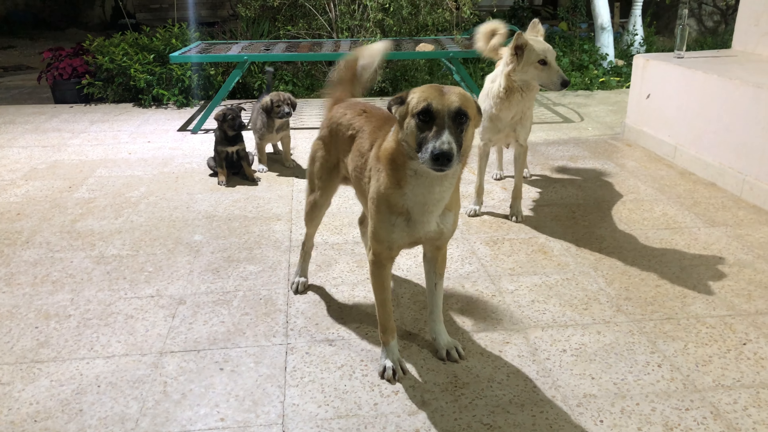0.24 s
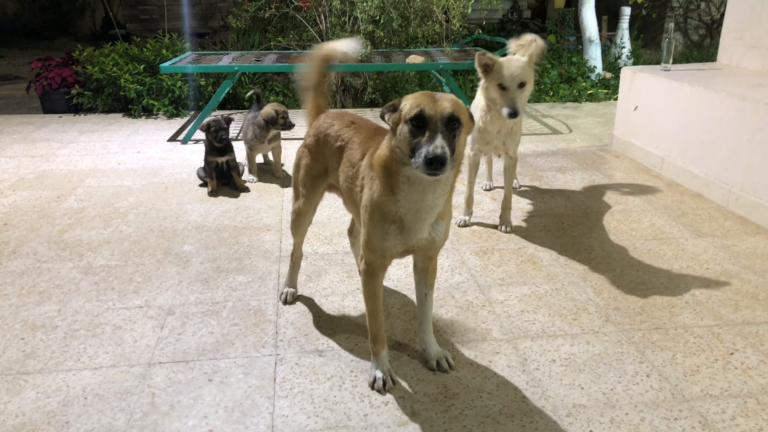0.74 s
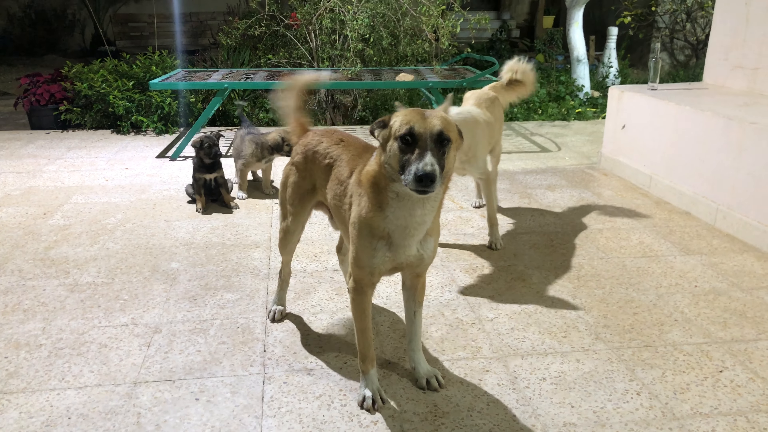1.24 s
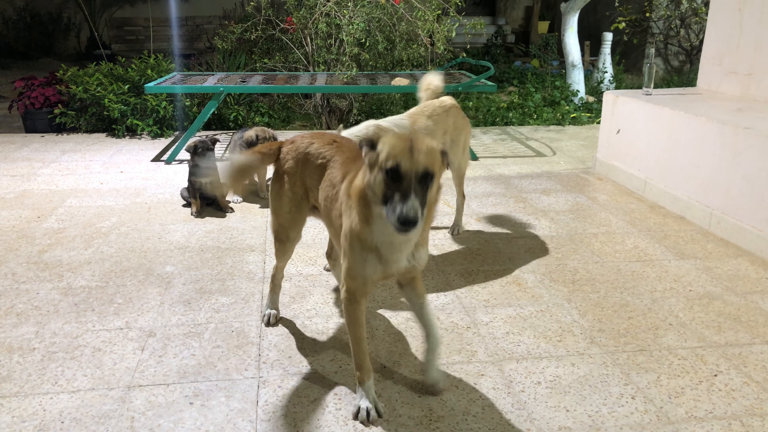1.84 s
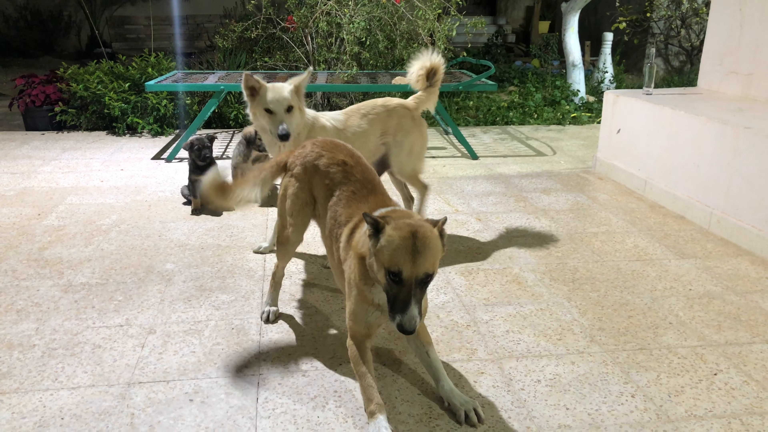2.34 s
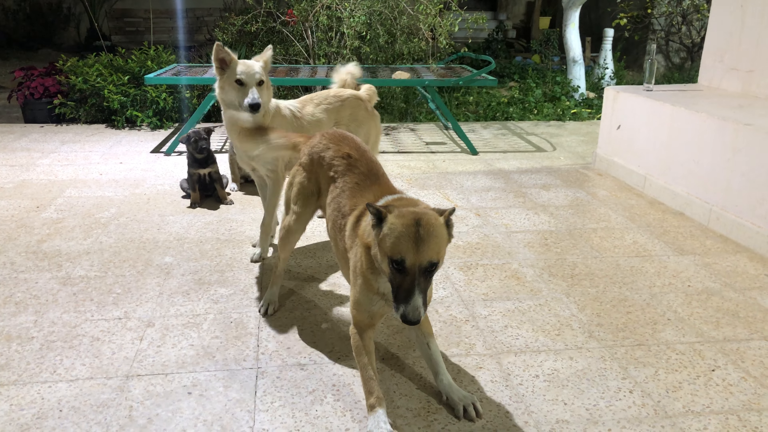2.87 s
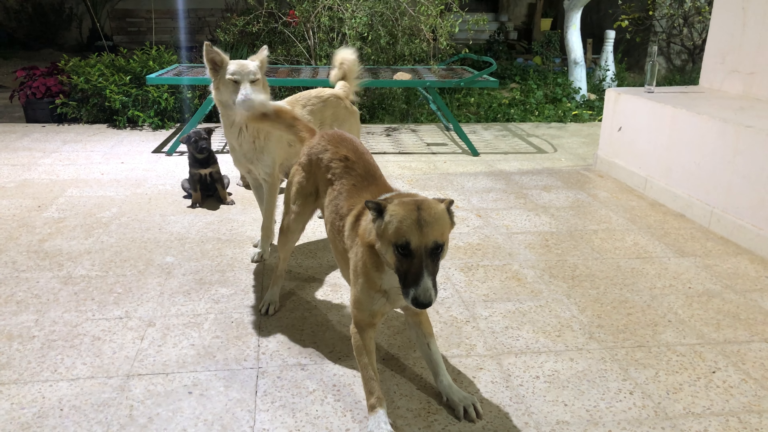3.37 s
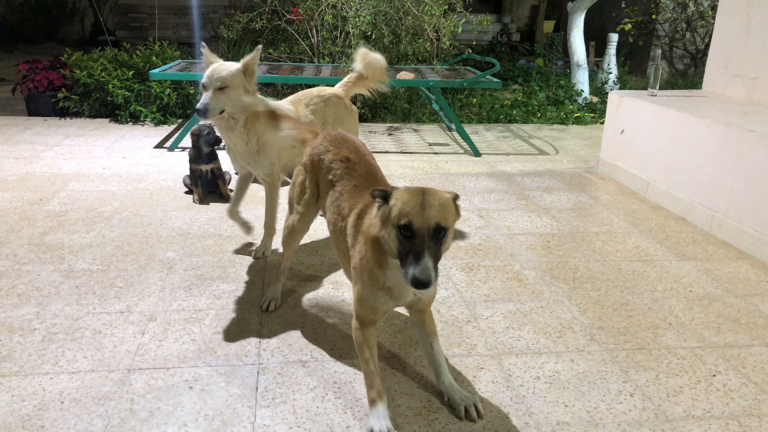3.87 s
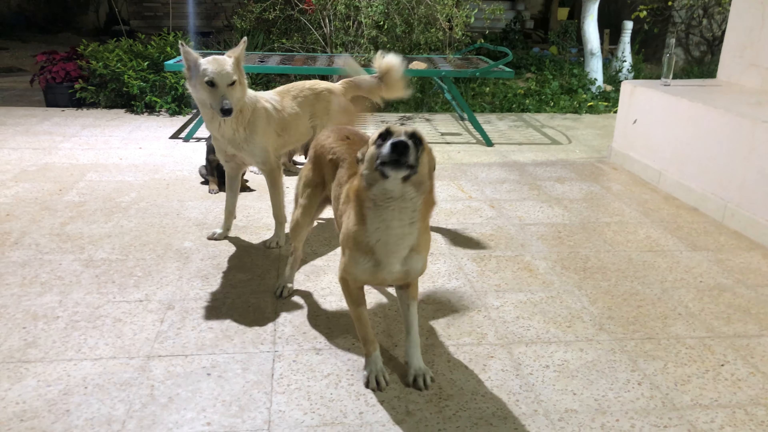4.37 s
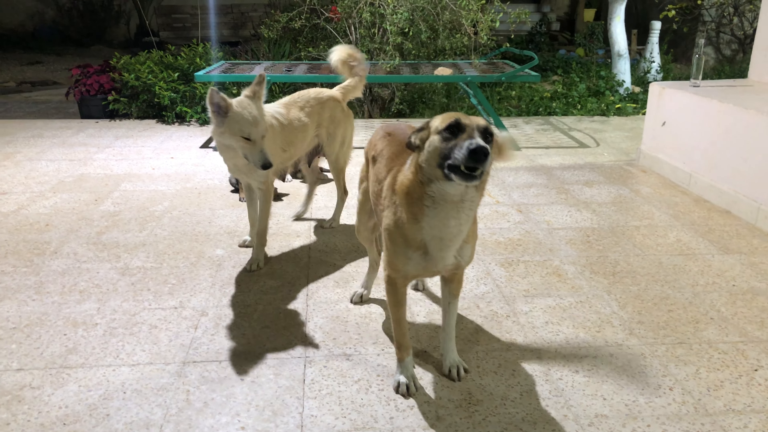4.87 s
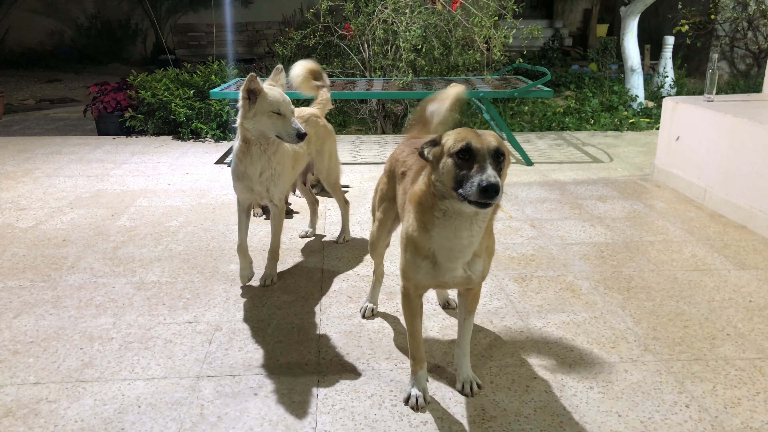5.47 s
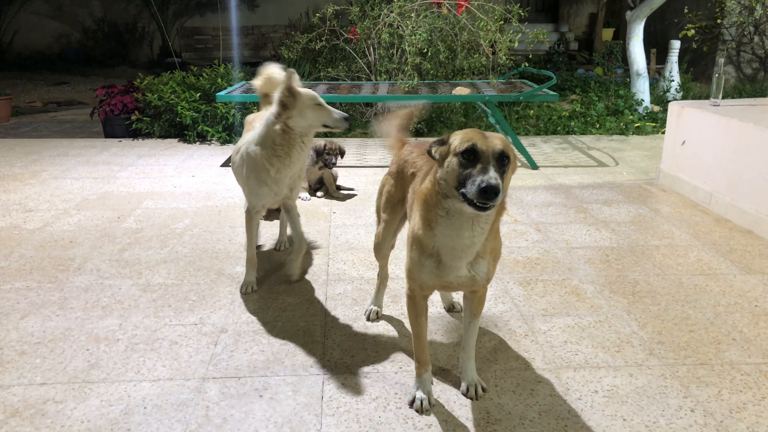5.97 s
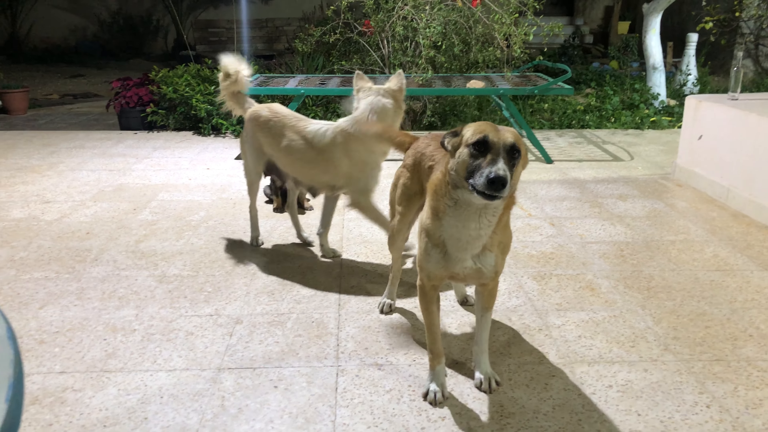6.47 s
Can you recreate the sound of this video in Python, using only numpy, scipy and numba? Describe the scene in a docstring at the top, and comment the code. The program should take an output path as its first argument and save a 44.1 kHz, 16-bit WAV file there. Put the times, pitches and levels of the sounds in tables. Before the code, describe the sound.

Very close to a phone microphone on a tiled patio at night, a big dog growls in six spells separated by brief gaps. The first is long, low and closed-mouthed; the second starts with a raised half-bark; the third is quiet and low. After a short grunt and paw scuffs come two harsher, higher snarls. Claws tick, a cricket chirps faintly, and a soft rumble lies beneath, with a short hard echo.

```python
"""A tiled patio at night: close to a phone, a dog growls in drawn-out spells.
Slow beats of its vocal folds ring chest, throat and mouth, and air hisses with each beat.
Loudness and rasp rise with the pitch; gusts of air tear at the voice, and once the dog sniffs.
Paws scuff as noise bumps, claws tick as short bursts, a cricket chirps in falling sine whistles.
Low walls echo all of these as a short noise tail; a faint night rumble lies beneath."""
import sys
import numpy as np
from scipy import signal
from scipy.fft import rfft, irfft, next_fast_len
from scipy.io import wavfile
from scipy.ndimage import uniform_filter1d
from numba import njit

SR = 44100
rng = np.random.default_rng(int(sys.argv[2]) if len(sys.argv) > 2 else 0)


def wav_record(signal):
    """Record a signal, one row per channel, as 16-bit PCM in the file named by sys.argv[1]."""
    frames = np.transpose(np.atleast_2d(signal))
    bounded = np.clip(frames, -1, 1)
    # unit amplitude maps onto the largest positive 16-bit level
    quanta = np.round(bounded * 32767).astype(np.int16)
    wavfile.write(sys.argv[1], SR, quanta)


N = 296263
T = np.arange(N) / SR  # time, s
TOP_HZ = 15900  # upper edge of the phone's range and of the echoes

# airway resonances in each posture, widths before damping: centre_hz [Hz], width_hz [Hz], level_db [dB]
LIPS_SHUT = [(601, 83, -6), (1495, 93, -28.5), (2340, 110, -41), (3250, 47, -29), (4600, 280, -15.5),
             (5020, 150, -9), (6500, 330, -20.5)]
HALF_BARK = [(610, 90, 14), (840, 70, 7), (1690, 110, 9), (2400, 60, -3), (4300, 280, -13),
             (5200, 180, -13), (6600, 200, -7)]
HEAD_DOWN = [(588, 100, -7), (2440, 64, -37), (4350, 35, -27), (4940, 550, -20)]
TEETH_BARED = [(518, 150, -2.5), (1050, 70, 0.5), (1490, 500, -4), (2683, 420, -3.5), (4020, 48, -2),
               (4440, 100, -9), (4800, 97, -27)]
# gusts of air through the open mouth, where the growl tears or lets go:
# centre_s [s], half_length_s [s], air_db [dB], push_db on the voice [dB]
GUSTS = [(1.321, 0.086, -55.5, 0.5), (1.829, 0.072, -50, 7.5), (2.413, 0.0067, -48, -6),
         (3.032, .14, -66, 4.5), (4.321, 0.012, -50, 9), (4.887, 0.074, -64, 5), (5.57, 0.063, -48.5, 3),
         (6.102, 0.045, -38, 4.5), (6.378, 0.073, -44.5, 0.5), (6.662, 0.029, -47, -4.5)]


def undb(db):
    """Decibels to gain."""
    return 10 ** (np.asarray(db) / 20)


def curves(table, t):
    """Each column of a table at the times t, joined by straight lines."""
    s, *columns = np.transpose(table)
    return [np.interp(t, s, column) for column in columns]


def unit(x):
    """Scale to rms 1."""
    return x / np.sqrt(np.mean(x ** 2) + 1e-20)


def steady(x, hold_s=0.043):
    """Scale to a running rms near 1; single beats keep their shape."""
    size = int(hold_s * SR)
    power = uniform_filter1d(uniform_filter1d(x ** 2, size), size // 2)
    return x / np.sqrt(np.abs(power) + 1e-4 * np.mean(x ** 2))


def band(x, lo_hz, hi_hz, order=3):
    """Band-pass between two edges."""
    edges_hz = [lo_hz, min(hi_hz, SR / 2 - 1000)]
    return signal.sosfilt(signal.butter(order, edges_hz, "band", fs=SR, output="sos"), x)


@njit
def ring(x, hz, width_hz):
    """One resonance whose centre may move, gain 1 at the centre."""
    y, b, low = np.empty(len(x)), 0., 0.
    for i in range(len(x)):
        g, k = np.tan(np.pi * hz[i] / SR), width_hz / hz[i]
        v = (b + g * (x[i] - low)) / (1 + g * (g + k))
        b, low, y[i] = 2 * v - b, low + 2 * g * v, k * v
    return y


def noise(spectrum):
    """Noise of rms 1 with a colour of (Hz, dB) points."""
    hz, db = np.transpose(spectrum)
    size = next_fast_len(N, True)
    bin_hz = np.fft.rfftfreq(size, 1 / SR)
    gain = undb(np.interp(np.log(bin_hz + 1), np.log(hz), db))
    return unit(irfft(rfft(rng.standard_normal(size)) * gain, size)[:N])


def walk(count, per_s):
    """A random wander of spread near 1: straight lines between random knots, per_s of them a second."""
    knots = rng.standard_normal(N // 20)
    return np.interp(T[:count] * per_s, np.arange(len(knots)), knots)


def swell(s, rise_s, fall_s):
    """A smooth bump of height 1 at time s."""
    out, near = np.zeros(N), np.abs(T - s) < .5
    t = T[near] - s
    side_s = np.where(t < 0, rise_s, fall_s)
    out[near] = np.exp(-np.minimum((t / side_s) ** 2, 20))
    return out


def envelope(t, attack_s, release_s):
    """A smooth rise at the start of the times t, a hold, and a smooth fall at their end."""
    ramp = np.clip(np.minimum((t - t[0]) / attack_s, (t[-1] - t) / release_s), 0, 1)
    return np.sin(np.pi / 2 * ramp) ** 2


def cricket(db=-64, start_hz=4560, glide_hz=620, stroke_s=0.0313, gap_s=.061, fade_db=2,
            echo_s=0.018, echo_db=-9):
    """A chirp is a few fading wing strokes, each a short falling whistle, repeated faintly by the garden wall."""
    # chirps: start_s [s], wing strokes [count]
    chirps = [(0.0, 2), (.481, 2), (.96, 3), (1.499, 2), (2.64, 1), (3.01, 2), (3.44, 3), (4.501, 2)]
    t = T[:int(stroke_s * SR)]
    whistle_hz = start_hz - glide_hz * t / stroke_s
    stroke = signal.windows.tukey(len(t), .5) * np.sin(2 * np.pi * np.cumsum(whistle_hz) / SR)
    out = np.zeros(N)
    for s, strokes in chirps:
        for k in range(round(strokes)):
            start = max(int((s + k * gap_s) * SR), 0)
            stroke_db = db - k * fade_db + 4.4 * walk(len(t), 380)  # each stroke shimmers
            out[start:start + len(t)] += undb(stroke_db) * stroke
    return out + undb(echo_db) * np.interp(T - echo_s, T, out, left=0)


def night(level_db=-55.5, waver_db=1.5):
    """Distant rumble and faint hiss, shaped from noise, whose level wavers."""
    # colour of the night air: freq_hz [Hz], density_db [dB per Hz]
    night_colour = [(20, -45), (35, -16), (75, -1.5), (180, 4), (260, -0.5), (360, -7.5), (800, -6.5),
                    (1500, -13), (2000, -20.5), (3200, -29.5), (4500, -27), (9000, -32.5), (16000, -37.5)]
    return noise(night_colour) * undb(level_db + waver_db * walk(N, 16.0))


def folds(pitch_hz, rough, jitter=0.061, shimmer_db=5.0, puff_db=2.6, rise_s=0.0022, fall_s=0.0031,
          air_leak=.17):
    """Beats of the vocal folds: their phase, a pulse at each closure, and the puff of turbulence that swells around it."""
    cycles = np.cumsum(pitch_hz) / SR
    chance = rng.standard_normal((400, 3))  # per beat: timing, strength, puff strength
    cycles = cycles + 1 + jitter * rough * np.interp(cycles, np.arange(len(chance)), chance[:, 0])
    beat = np.round(cycles).astype(int)
    since_s = (cycles - beat) / pitch_hz  # negative ahead of the closure
    size = undb(shimmer_db * rough * chance[beat, 1])
    pulses = np.diff(np.floor(cycles), prepend=np.floor(cycles[0])) * size
    puff = np.where(since_s < 0, np.exp(-(since_s / rise_s) ** 2), np.exp(-since_s / fall_s))
    leak = air_leak * (0.36 + rough)  # air that passes between the puffs too
    gate = size * undb(puff_db * chance[beat, 2]) * puff + leak
    return cycles % 1, unit(pulses), unit(gate * rng.standard_normal(N)[:len(cycles)])


def chest(phase, pitch_hz, fundamental_db, overtones_db, count=5):
    """The lowest harmonics are clean; each swells as it slides through a resonance of the chest."""
    # what chest and neck radiate at the easy pitch, before each spell's trim: freq_hz [Hz], level_db [dB]
    chest_response = [(55, -62), (70, -56.5), (84, -51.3), (105, -42.7), (125, -51), (145, -53.5),
                      (170, -48.3), (190, -45), (212, -54), (245, -56.5), (275, -62.5), (370, -70)]
    hz, db = np.transpose(chest_response)
    harmonics = []
    for k in range(1, count + 1):
        level_db = np.interp(np.log(k * pitch_hz), np.log(hz), db)
        harmonics.append(np.sqrt(2) * undb(level_db) * np.sin(2 * np.pi * k * phase))
    return undb(fundamental_db) * harmonics[0] + undb(overtones_db) * sum(harmonics[1:])


def airway(x, resonances, lag_ms, damping_hz=20, quiver=0, flutter_db=3.0, bounce=0.35):
    """Resonances that quiver with the lips and tongue; the bounce off the tiles cuts a comb into them."""
    out = 0
    for hz, width_hz, db in resonances:
        centre_hz = hz * (1 + quiver * walk(len(x), 9.26))
        gain = undb(db + flutter_db * walk(len(x), 10.83))
        out = out + gain * ring(x, centre_hz, float(width_hz + damping_hz))
    t = T[:len(x)]
    return out + bounce * np.interp(t - lag_ms / 10 ** 3, t, out, left=0)


def jaws(x, resonances, gape, lag_ms, **options):
    """The airway passes from its posture to the snarl as the jaws gape (0-1)."""
    # airway resonances of the snarl, widths before damping: centre_hz [Hz], width_hz [Hz], level_db [dB]
    snarl = [(544, 97, 4), (960, 130, -2), (1383, 150, -4), (1860, 70, -3), (2460, 140, -2),
             (4340, 300, -10), (4900, 240, -15), (6900, 600, -17)]
    shut = unit(airway(x, resonances, lag_ms, **options))
    wide = unit(airway(x, snarl, lag_ms, **options))
    return np.sqrt(1 - gape) * shut + np.sqrt(gape) * wide


def growl(spell, pitch, posture, nose_db=-46, throat_rasp=3.4, mouth_rasp=5.6, least_rasp=0.05, sway=0.072):
    """One spell: the folds drive the chest, nose, throat and mouth; the higher the band, the more of it is turbulence."""
    # the jaws open into the snarl early in some spells: widest_s [s], half_length_s [s], mouth_db [dB]
    gapes = [(1.836, 0.058, -1), (2.938, 0.055, 17.5), (4.944, 0.21, 2.5)]
    # gaps between the teeth, widths before damping: centre_hz [Hz], width_hz [Hz], level_db [dB]
    tooth_gaps = [(10840, 2190, 1), (13300, 5700, -3)]
    easy_hz = 70
    rough_per_octave, gust_rough, edge_rough = .25, .25, .3
    chest_db_per_octave, throat_db_per_octave, mouth_db_per_octave = 15, 19.5, 8.5
    start_s, end_s, attack_s, release_s, throat_db, fundamental_db, overtones_db, calm_rough = spell
    resonances, mouth_db, hiss_db, teeth_db, bounce_ms = posture

    on = (T >= start_s) & (T <= end_s)
    pitch_hz, = curves(pitch, T[on])
    effort = np.log2(pitch_hz / easy_hz)  # octaves above an easy growl
    strain = np.maximum(effort, 0)
    flow = envelope(T[on], attack_s, release_s)
    surges = [(swell(s, length_s, length_s)[on], push_db) for s, length_s, _, push_db in GUSTS]
    openings = [(swell(s, length_s, length_s)[on], open_db) for s, length_s, open_db in gapes]
    gape = np.clip(sum(opening for opening, _ in openings), 0, 1)
    tear = gust_rough * sum(surge for surge, _ in surges) + edge_rough * (1 - flow)
    rough = np.clip(calm_rough + rough_per_octave * strain + tear, 0, 1)
    lag_ms = bounce_ms * (1 + sway * walk(on.sum(), 3.37))  # the head sways
    quiver = .016 + .06 * strain  # share by which the resonances wander

    phase, pulses, puffs = folds(pitch_hz, rough)
    nose = rough * steady(band(band(puffs, 112.0, 254.7, order=2), 74, 395))
    throat_drive = pulses + throat_rasp * rough ** 2 * puffs
    throat_ring = jaws(throat_drive, resonances, gape, lag_ms, quiver=quiver, damping_hz=69.0)
    throat = steady(band(throat_ring, 352, 871))
    # the same rasping air rings the mouth and, higher up, hisses in the muzzle
    mouth_drive = pulses + mouth_rasp * (rough + least_rasp) * puffs
    rasp = jaws(mouth_drive, resonances, gape, lag_ms, quiver=quiver)
    mouth = steady(band(rasp, 1048, 2785, order=5))
    hiss = steady(band(rasp, 3510, 8200, order=4))
    teeth = steady(band(airway(puffs, tooth_gaps, lag_ms), 6850, 15000, order=2))

    open_mouth_db = sum(opening * open_db for opening, open_db in openings)
    bright_db = mouth_db + mouth_db_per_octave * effort + open_mouth_db
    voice = throat + undb(bright_db) * mouth + undb(hiss_db) * (hiss + undb(teeth_db) * teeth)
    surge_db = sum(surge * push_db for surge, push_db in surges)
    voice_db = throat_db + throat_db_per_octave * effort + surge_db
    rumble = chest(phase, pitch_hz, fundamental_db, overtones_db) + undb(nose_db) * nose
    out = np.zeros(N)
    out[on] = flow * (undb(voice_db) * voice + undb(chest_db_per_octave * effort) * rumble)
    return out


def ticks(crack_s=0.002, tail_db=-24):
    """Each tick is a sharp noise crack with a short rustle behind it."""
    # claw ticks and lip smacks: start_s [s], level_db [dB], treble_db of the band near 12.7 kHz [dB]
    tick_hits = [(0.1986, -41, -10), (1.442, -52.5, -3), (2.304, -47.5, -6), (2.597, -42, 12),
                 (2.862, -47.5, 2), (3.7893, -48.5, -9.5), (3.917, -47, -1), (4.1807, -43.5, 0),
                 (4.48, -52.5, 0), (4.732, -38.5, -8), (4.808, -37, -3), (5.7326, -47, 7)]
    out = np.zeros(N)
    t = T[:SR // 8]
    decay = np.exp(-t / crack_s) + undb(tail_db) * np.exp(-t / (10 * crack_s))
    for s, db, treble_db in tick_hits:
        burst = rng.standard_normal(len(t)) * decay
        body = 1.48 * band(burst, 3770, 10300, order=2)
        treble = undb(treble_db) * band(burst, 12500, 13000, order=2)
        start = int(s * SR)
        out[start:start + len(t)] += undb(db) * (body + treble)
    return out


def gusts(throb_db=3):
    """Unvoiced air rushes through the open jaws, throbbing as the lips flap."""
    # resonances of the open mouth, widths before damping: centre_hz [Hz], width_hz [Hz], level_db [dB]
    open_mouth = [(1075, 120, 2.5), (1474, 16, 1), (2620, 136, -12), (4310, 36, -10), (4330, 45, -42)]
    flow = sum(undb(db) * swell(s, length_s, length_s) for s, length_s, db, _ in GUSTS)
    air = rng.standard_normal(N)
    rush = sum(undb(db) * ring(air, np.full(N, float(hz)), float(width_hz + 50))
               for hz, width_hz, db in open_mouth)
    return flow * undb(throb_db * walk(N, 130)) * unit(band(rush, 530, 5000, order=2))


def paws(grain_db=3.5):
    """Pads drag over gritty tile: a bright, grainy swish of noise for each slide."""
    # pads sliding on the tiles: peak_s [s], rise_s [s], fall_s [s], level_db [dB]
    scuffs = [(2.03, 0.074, 0.056, -49), (2.34, 0.056, 0.11, -67), (2.781, 0.0076, 0.013, -63.5),
              (2.87, 0.016, 0.027, -66), (3.965, 0.032, 0.021, -48), (3.995, 0.0062, 0.0085, -40.5),
              (4.17, 0.19, 0.058, -57), (4.375, 0.05, 0.043, -54), (4.77, 0.025, 0.051, -57.5)]
    # colour of pad on tile: freq_hz [Hz], density_db [dB per Hz]
    scuff_colour = [(880, -29), (1500, -13), (2250, -3), (3150, -6), (3450, -1.5), (9100, 0.5), (14200, -4),
                    (16000, -19)]
    power = sum(undb(db) ** 2 * swell(s, rise_s, fall_s) for s, rise_s, fall_s, db in scuffs)
    return np.sqrt(power) * unit(undb(grain_db * walk(N, 700)) * noise(scuff_colour))


def sniff(s=4.705, length_s=0.027, db=-56):
    """The dog draws air through its nose before it snarls: one soft bump of band-passed noise."""
    return undb(db) * swell(s, length_s, length_s) * unit(band(rng.standard_normal(N), 1800, 3900))


def patio(x, t60_s=0.19, wet_db=-10.0, first_s=0.005, low_cut_hz=330):
    """Tiles and low walls add a short tail: a noise burst without bass, so the low harmonics stay clean and dry."""
    t = T[:SR // 2]
    echoes = band(band(rng.standard_normal(len(t)), 250, 2500, order=1), low_cut_hz, TOP_HZ)
    tail = echoes * np.exp(-np.log(1000) * t / t60_s) * (t > first_s)
    return x + undb(wet_db) * signal.oaconvolve(x, tail / np.sqrt(np.sum(tail ** 2)))[:N]


def scene():
    """The dog and its steps on the patio, with the garden behind."""
    # spells of growling: start_s [s], end_s [s], attack_s [s], release_s [s], throat_db at the easy pitch [dB],
    # fundamental_db [dB], chest overtones_db [dB], calm roughness [0-1]
    spells = [(0.014, 1.499, 0.031, .13, -43, 4, -0.5, 0.16),
              (1.756, 2.475, 0.028, 0.08, -51, 0.5, 2.5, .14),
              (2.898, 3.922, 0.05, 0.078, -54, 1, 2.5, .05), (4.218, 4.38, 0.034, 0.14, -53, 6.5, 0, 0.48),
              (4.809, 5.661, 0.045, 0.15, -47.5, 2.5, -2, 0.15),
              (5.958, 6.73, 0.022, 0.049, -46.5, 3.5, 1, .21)]
    # beat rate of the vocal folds through each spell, before jitter: time_s [s], pitch_hz [Hz]
    pitches = [
        [(0.04, 58.57), (0.164, 67.6), (0.376, 70.63), (0.494, 63.93), (0.668, 63.84), (0.77, 56.3),
         (0.864, 60.74), (0.978, 56.27), (1.142, 66.8), (1.34, 71.38), (1.48, 56.9)],
        [(1.755, 81.53), (1.841, 116.6), (1.889, 100.5), (2.026, 88.9), (2.125, 97.3), (2.24, 67.1),
         (2.46, 55.65)],
        [(2.9, 60.5), (2.974, 65.8), (3.33, 56.34), (3.405, 63.9), (3.762, 64.6), (3.9, 49)],
        [(4.22, 54.2), (4.282, 69.4), (4.39, 53.6)],
        [(4.83, 71.8), (4.957, 106.5), (5.088, 104.1), (5.267, 74.3), (5.43, 85.7), (5.552, 74.6), (5.65, 55)],
        [(5.97, 70.85), (6.12, 87.2), (6.272, 81.65), (6.378, 88.34), (6.575, 82.54), (6.718, 63.65)],
    ]
    # posture of each spell: resonances, mouth_db and hiss_db relative to the throat [dB],
    # teeth_db relative to that hiss [dB], mean lag of the bounce off the tiles bounce_ms [ms]
    stances = [(LIPS_SHUT, -15.5, -23, -12, 2.136), (HALF_BARK, -10, -13, -14, 1.365),
               (HEAD_DOWN, -20.5, -11.5, -18.5, 1.8), (HALF_BARK, -7.5, -11, -12, 1.42),
               (TEETH_BARED, -10.5, -16.5, -4.2, 2.07), (TEETH_BARED, -10, -18.5, -3.5, 1.966)]
    voice = sum(growl(*spell) for spell in zip(spells, pitches, stances))
    near = voice + gusts() + paws() + ticks() + sniff() + cricket()
    return (patio(near) + night())[None]


def record(dry):
    """The phone drops the deepest bass and cuts the top."""
    thin = signal.sosfilt(signal.butter(4, 56, "high", fs=SR, output="sos"), dry)
    return signal.sosfilt(signal.ellip(10, .2, 70, TOP_HZ, fs=SR, output="sos"), thin)


dry = scene()
out = record(dry)
wav_record(out)
```